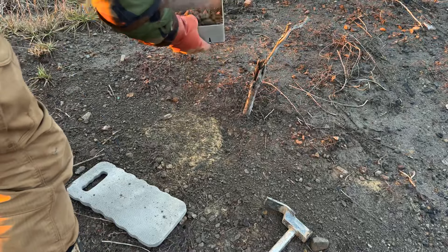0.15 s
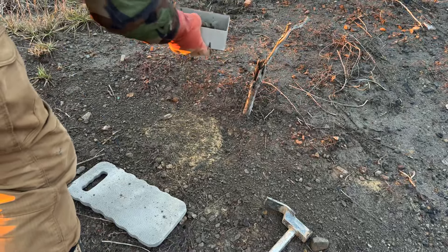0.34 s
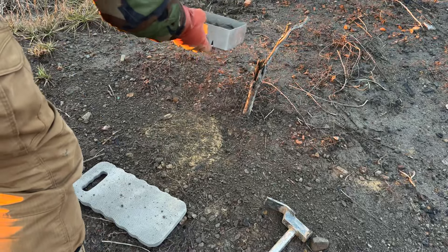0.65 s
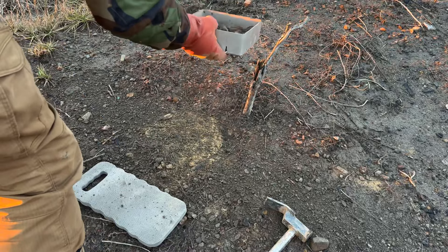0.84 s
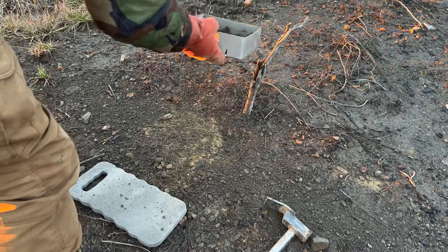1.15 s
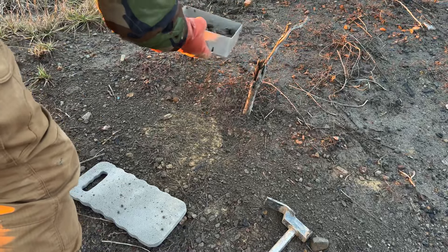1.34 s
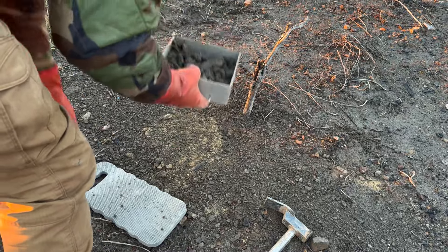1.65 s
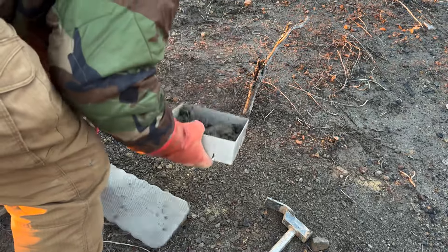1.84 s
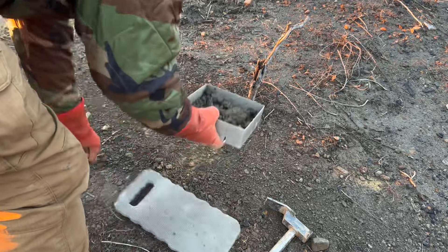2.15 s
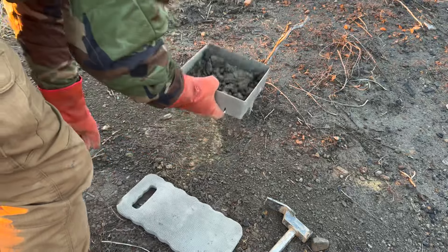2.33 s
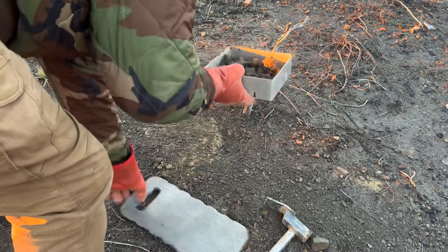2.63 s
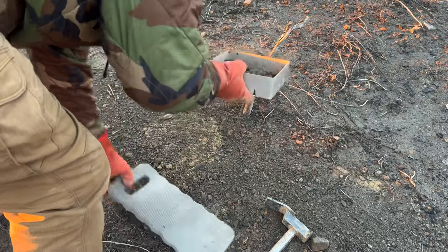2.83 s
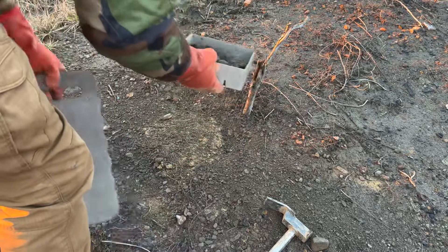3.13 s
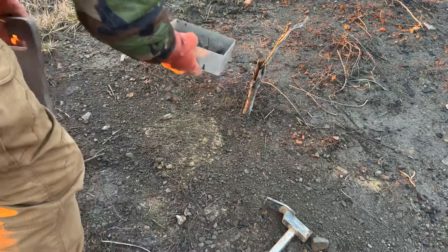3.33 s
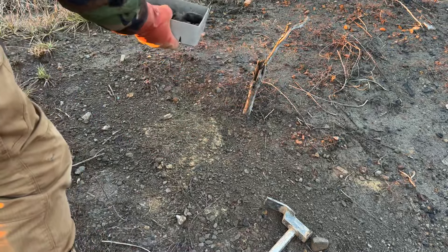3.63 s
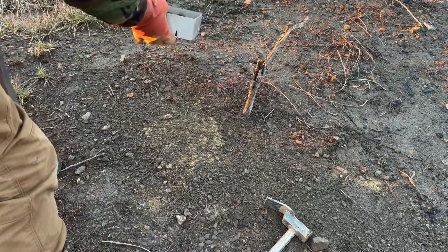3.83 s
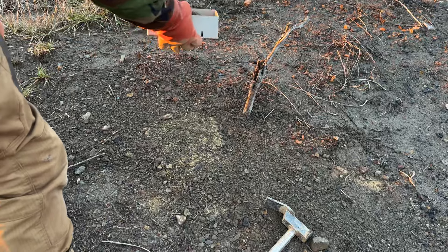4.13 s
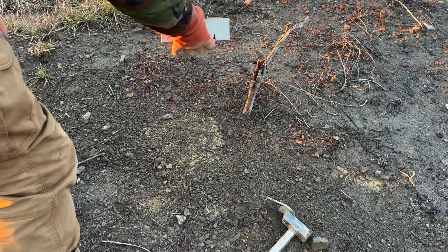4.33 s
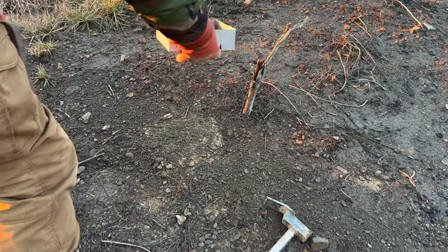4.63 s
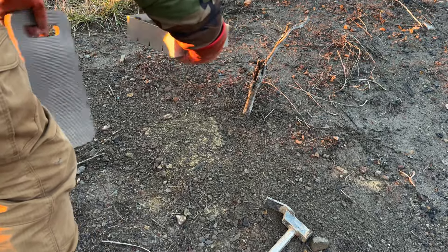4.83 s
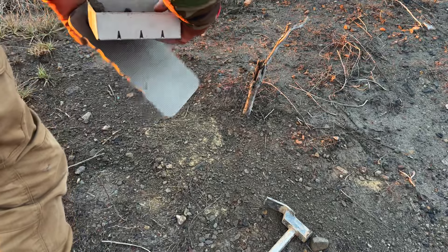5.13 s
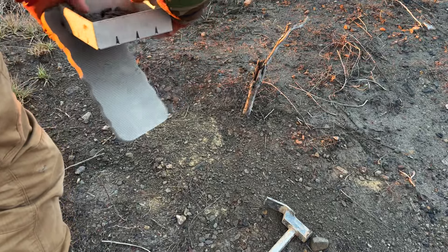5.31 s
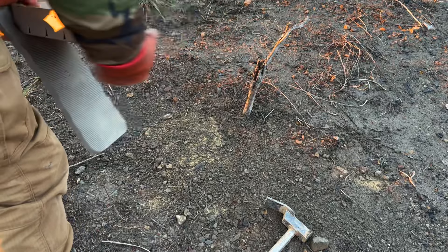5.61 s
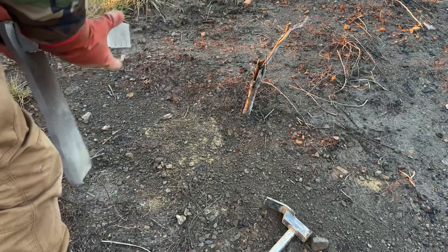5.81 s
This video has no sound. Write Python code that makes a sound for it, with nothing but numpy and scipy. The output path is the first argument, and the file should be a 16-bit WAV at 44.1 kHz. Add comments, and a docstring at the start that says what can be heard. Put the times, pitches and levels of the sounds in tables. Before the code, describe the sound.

Outdoors, close in stereo, a small metal sifter loaded with dirt and stones is shaken by hand. From 0 to 0.9 seconds it is dense and loud: gritty scratching, sandy high hiss, stones knocking the walls with short metallic ring, strongest near 0.47 and 0.65, the floor drumming low, and clods popping dully on the ground, a big one at 0.85. Wind rumbles and flutters briefly near 0.5. Shaking weakens until 1.5. Around 1.7 to 2.2 a boot grinds gravel, with clod cracks, low thuds and stiff clothing rustle. A hard, bright clack at 2.38 restarts the shaking, now lighter, in separate strokes with knocks around 3.2 and 3.7, thinning out by 4.6. Then mostly fabric swishes and creases, with a dull clod-like thump at 5.27, faint metal ticks at 5.5 and 5.7, and a last soft rustle over quiet open air.

```python
"""Outdoors, a small metal box sifter full of dirt and stones is shaken by hand.
Stones knock on its walls as short bursts that make the metal ring (one late, dull clod-like thump is made the
same way); many tiny clicks make the grit scratch. The loaded floor drums as a low, quickly fading swing.
Clods crack on the ground as dull pops and gravel grinds underfoot as the person steps and bends. Thuds are
low swings; work clothes rustle as coloured noise and creases. A little wind touches the microphone as low,
fluttering noise, over a faint bed of open air.
"""
import sys
import numpy as np
from scipy import signal
from scipy.fft import rfft, irfft, next_fast_len
from scipy.io import wavfile
from scipy.ndimage import uniform_filter1d

SR = 44100
rng = np.random.default_rng(int(sys.argv[2]) if len(sys.argv) > 2 else 0)


def generate_wav(signal):
    """Clip the signal to [-1, 1] and save it as 16-bit WAV at the path in sys.argv[1]."""
    frames = np.transpose(np.atleast_2d(signal))
    scaled = np.clip(frames, -1, 1) * 32767
    pcm = np.round(scaled).astype(np.int16)
    wavfile.write(sys.argv[1], SR, pcm)


N = 263053


def from_db(db):
    """Turn decibels into a gain."""
    return 10 ** (np.asarray(db) / 20)


def rms_one(x):
    """Scale a sound to an average power of 1."""
    return x / np.sqrt(np.mean(x ** 2) + 1e-20)


def at_hz(points, hz):
    """Read a table along a logarithmic pitch scale, with straight lines between its points."""
    points = np.array(points)
    return np.interp(np.log(hz + 1e-9), np.log(points[:, 0]), points[:, 1])


def in_time(rows, column):
    """Read one column of a curve at every sample."""
    rows = np.array(rows)
    return np.interp(np.arange(N) / SR, rows[:, 0], rows[:, column])


def shape(x, response):
    """Filter a sound by a function of frequency."""
    size = next_fast_len(N + 4096)
    spectrum = rfft(x, size) * response(np.fft.rfftfreq(size, 1 / SR))
    return irfft(spectrum, size)[..., :N]


def band(x, low_hz, high_hz, order=2):
    """Keep what lies between two frequencies."""
    edges_hz = [low_hz, min(high_hz, .45 * SR)]
    return signal.sosfilt(signal.butter(order, edges_hz, "band", fs=SR, output="sos"), x + 1e-18)


def resonate(x, hz, width_hz):
    """Ring at one pitch, with gain 1 at the peak; a narrower resonance rings longer."""
    r = np.exp(-np.pi * width_hz / SR)
    feed = np.array([1, 0, -1]) * (1 - r * r) / 2
    return signal.lfilter(feed, [1, -2 * r * np.cos(2 * np.pi * hz / SR), r * r], x + 1e-18)


def ring_together(x, modes, most_sharpness=np.inf):
    """Add up several resonances with alternating sign; sharpness is pitch over width."""
    ringing = 0
    for k, (hz, width_hz, db) in enumerate(modes):
        ringing = ringing + (-1) ** k * from_db(db) * resonate(x, hz, max(width_hz, hz / most_sharpness))
    return ringing


def drift(rate):
    """Random wandering with unit power, joining `rate` random points a second."""
    knots = rng.standard_normal(4096)
    return rms_one(np.interp(np.arange(N) / SR * rate, np.arange(len(knots)), knots))


def pan(db):
    """Left and right gains, fixed or moving; above 0 dB the left is louder."""
    return from_db(np.array([[1], [-1]]) * db / 2)


def widen(three, spread):
    """Make stereo from one shared signal plus one of its own for each side."""
    return (three[0] + spread * three[1:]) / np.sqrt(1 + spread ** 2)


def add(out, s, sound):
    """Mix a sound in, starting at time s."""
    at = max(round(s * SR), 0)
    out[:, at:at + sound.shape[-1]] += sound[..., :N - at]


def grains(per_s, size_db, clump_db, spread):
    """Stereo clicks at random moments, uneven in size and stronger in clumps."""
    born = rng.random(N) < per_s / SR
    uneven_db = size_db * np.minimum(rng.exponential(1, N), 4)
    clumps_db = clump_db * np.clip(drift(130), -2, 1.5)
    return widen(rng.standard_normal((3, N)), spread) * born * from_db(uneven_db + clumps_db)


def pebbles(per_s, size_db, low_hz, high_hz, sharpness, count=14):
    """Small stones tick: each click is dealt to one of several pitches and rings there."""
    ticks = grains(per_s, size_db, clump_db=5.0, spread=0.49)
    dealt = rng.integers(0, count, N)
    pitches_hz = np.geomspace(low_hz, high_hz, count)
    return sum(resonate(ticks * (dealt == k), hz, hz / sharpness) for k, hz in enumerate(pitches_hz))


def noise(spectrum, spread):
    """Coloured stereo noise of unit power."""
    white = widen(rng.standard_normal((3, N)), spread)
    return rms_one(shape(white, lambda hz: from_db(at_hz(spectrum, hz))))


def steady(x, span_s):
    """Hold the power near 1 over a span, leaving the grain inside it."""
    power = uniform_filter1d(np.mean(x ** 2, axis=0), int(span_s * SR))
    return x / np.sqrt(np.maximum(power, 1e-18))


def swells(rows, attack_s, release_s, share=False):
    """Gain of movements that swell and die by 20 dB in the given times; share adds the fourth column's dB."""
    t, power = np.arange(0, N, 32) / SR, 1e-16
    for s, length_s, db, *part_db in rows:
        outside = np.maximum(s - t, 0) / attack_s + np.maximum(t - s - length_s, 0) / release_s
        level_db = db + (part_db[0] if share else 0)
        power = power + from_db(level_db - 20 * np.minimum(outside, 10)) ** 2
    return np.interp(np.arange(N) / SR, t, np.sqrt(power))


def air():
    """Open air: faint, steady noise that is independent in part on each side."""
    # colour of the air: pitch_hz, relative level_db
    air_colour = [(24, -8.5), (40, -3), (115, -11), (210, -11.5), (550, -6.5), (800, -12.5), (1700, -17.5),
                  (4000, -22.5), (10000, -29), (13000, -31.5), (16000, -40)]
    level_db = -63
    return from_db(level_db) * noise(air_colour, spread=1.0)


def wind():
    """Wind buffets each port largely by itself: deep rumble, with lumpy flutter in the stronger gusts."""
    # wind strength before the small lifts below: time_s, rumble_db, flutter_db
    gusts = [(0.0, -47.5, -72), (0.45, -42.5, -39.5), (0.98, -63, -53.5), (1.73, -55, -68.5),
             (1.84, -49.5, -42), (2.06, -66, -64.5), (2.92, -58.5, -56.5), (3.07, -67, -63.5),
             (5.96, -68, -72)]
    rumble = steady(band(widen(rng.standard_normal((3, N)), spread=1.4), 47, 82), span_s=0.046)
    flutter = band(widen(rng.standard_normal((3, N)), spread=2.5), 64, 160)
    flutter = steady(flutter * from_db(3.0 * drift(45)), span_s=0.12)
    rumble_gain = from_db(2.0 + in_time(gusts, column=1))
    flutter_gain = from_db(2.5 + in_time(gusts, column=2))
    return pan(4.3) * (rumble_gain * rumble + flutter_gain * flutter)


def clothes():
    """Stiff fabric swishes and flaps in small creases; a brushing sleeve adds a soft narrow hiss."""
    # arm and leg movements, before the final trims: start_s, length_s, swish_db, flap_against_swish_db
    rustles = [(1.76, 0.14, -48, -3), (1.96, 0.075, -47.5, -1), (2.18, 0.019, -52.5, 2),
               (2.31, 0.024, -60, -1), (4.605, 0.036, -57, 6), (4.75, .12, -57, -5.5),
               (5.035, 0.046, -45, -2), (5.278, 0.0083, -45.5, -3.5), (5.405, 0.048, -50, -1.5),
               (5.698, 0.0073, -54.5, 0.5), (5.785, 0.022, -57, 1), (5.91, 0.035, -57, -5.5)]
    # a sleeve brushes along the jacket: start_s, length_s, level_db
    brushes = [(4.58, 0.026, -57), (4.78, 0.087, -58.5), (5.795, 0.0085, -55.5)]
    # colours of swish and flap: pitch_hz, relative level_db
    swish_colour = [(800, -14.5), (1500, -8.5), (2500, -9), (3500, -10.5), (5000, -6), (6200, -13.5),
                    (8400, -10), (10000, -14.5), (13000, -24), (15500, -7)]
    flap_colour = [(71, -22), (120, 8.5), (157, -31.5), (227, 1.5), (551, -9.5), (882, -5.5), (1360, -12.5),
                   (2500, -34.5), (3250, -54), (5500, -120)]
    attack_s, release_s = 0.063, 0.11

    crinkle = grains(per_s=1800, size_db=2.5, clump_db=3, spread=0.88)
    crinkle = rms_one(band(crinkle, 1800, 18000))
    swish = noise(swish_colour, spread=1.0) * from_db(4.6 * drift(170))
    swish = steady(swish + .6 * crinkle, span_s=0.14)
    creases = from_db(4.5 * drift(110))
    flap = steady(noise(flap_colour, spread=0.91) * creases, span_s=0.075)
    brush = rms_one(band(widen(rng.standard_normal((3, N)), spread=0.32), 3900, 5100))

    swish = from_db(3.5) * swish * swells(rustles, attack_s, release_s)
    flap = from_db(-1.6) * flap * swells(rustles, attack_s, release_s, share=True)
    return pan(0.45) * (swish + flap + brush * swells(brushes, attack_s, release_s))


def clods():
    """A clod cracks with a dull pop of a few swings, then crumbles in fading noise."""
    # clods and gravel cracking on the ground: time_s, pop_db, pitch_hz, left_right_db
    cracks = [(0.46, -21, 1150, 6), (0.5552, -18, 1140, 6), (0.618, -23.5, 1290, 4), (0.7597, -19, 1080, 4),
              (0.8545, -13, 1140, 4), (1.1195, -26.5, 930, 8), (1.7158, -29, 1854, 1),
              (1.7458, -22.5, 1380, 0), (1.782, -20, 1210, -10), (1.8015, -17.5, 1130, 3),
              (1.931, -26, 1780, 1.3), (1.982, -27.5, 650, 4.5), (2.0067, -29, 1230, 3),
              (2.0458, -26.5, 922, 1), (2.0505, -29, 788, 3), (2.1946, -31, 1005, 2.5),
              (2.203, -30, 840, -0.5), (2.5933, -30.5, 1250, 0), (5.024, -33.5, 970, 8),
              (5.0375, -35, 1460, 12), (5.177, -39, 920, 5), (5.3685, -40.5, 920, 8)]
    pop_cycles, crumble_gain, crumble_t60_s = 0.92, .09, 0.057
    out, t = np.zeros((2, N)), np.arange(SR // 25) / SR
    for s, db, hz, side_db in cracks:
        age = t * hz / pop_cycles
        pop = (age * np.exp(1 - age)) ** 2 * np.sin(2 * np.pi * (hz * t + rng.random()))
        crumbs = rms_one(band(widen(rng.standard_normal((3, len(t))), spread=.5), 600, 2000, order=1))
        crumbs = crumble_gain * crumbs * from_db(-60 * t / crumble_t60_s)
        add(out, s, from_db(db) * pan(side_db) * (pop + crumbs))
    return out


def gravel():
    """Gravel grinds under the boot: many small stones tick at medium pitches."""
    # a boot rolls over gravel: start_s, length_s, level_db
    steps = [(1.76, 0.051, -36), (1.98, .05, -50), (2.18, 0.029, -49), (5.91, 0.01, -57.5)]
    grind = pebbles(per_s=1100, size_db=2.5, low_hz=765, high_hz=1670, sharpness=2.4)
    grind = steady(band(grind, 810, 2700), span_s=0.035)
    return swells(steps, attack_s=0.038, release_s=0.14) * grind * pan(3.0)


def low_blows(events, rise_s, scatter, rough):
    """Soft blows (s, dB, Hz, t60 s): a fading low swing with scattered pitch, roughened by loose lumps."""
    out, t = np.zeros((2, N)), np.arange(SR // 4) / SR
    for (s, db, hz, t60), chance in zip(events, rng.uniform(-1, 1, len(events))):
        swing = np.sin(2 * np.pi * hz * (1 + scatter * chance) * t)
        lumps = rough * rms_one(band(rng.standard_normal(len(t)), 460, 600)) * from_db(-30 * t / t60)
        add(out, s, from_db(db - 60 * t / t60) * (1 - np.exp(-t / rise_s)) * (swing + lumps))
    return out


def thuds():
    """Boot and kneeling pad land softly: a low swing that fades by 60 dB within nine cycles."""
    # thuds before the 7 dB lift: time_s, level_db, middle pitch_hz
    landings = [(0.429, -39, 90), (0.499, -41, 190), (0.906, -41.5, 261), (1.838, -31, 243.5),
                (1.85, -33.5, 110), (1.86, -30.5, 278), (1.965, -42.5, 250), (2.859, -43.5, 120),
                (4.724, -44, 210), (5.026, -43, 257), (5.043, -41.5, 200), (5.119, -41, 247),
                (5.274, -31.5, 260), (5.698, -40, 277)]
    cycles = 9
    blows = [(s, db, hz, cycles / hz) for s, db, hz in landings]
    return from_db(7.0) * pan(1.7) * low_blows(blows, rise_s=0.0017, scatter=0.094, rough=0.24)


def drum():
    """The load lands on the floor of the box, which swings in its lowest mode."""
    # landings before the 8 dB lift: time_s, level_db
    landings = [(0.466, -35.5), (0.651, -37), (0.696, -50.5), (1.414, -43.5), (1.469, -38.5), (2.652, -46),
                (2.766, -51.5), (2.915, -52), (3.049, -42), (3.61, -51), (3.871, -42), (4.063, -39),
                (4.304, -46), (4.555, -42)]
    middle_hz, t60_s = 305.3, 0.11
    blows = [(s, db, middle_hz, t60_s) for s, db in landings]
    return from_db(8.0) * low_blows(blows, rise_s=0.00067, scatter=0.039, rough=0.18)


def walls(x, direct_db):
    """The walls ring on top of the bare contact sound; the dirt keeps every ring short."""
    # ringing of the walls: pitch_hz, least width_hz, level_db
    wall_modes = [(1005, 93, -3), (1242, 150, 8), (1966, 47, 0), (2054, 37, 2.5), (2540, 470, 8),
                  (2653, 43, 9.5), (2646, 60, 0.5), (4013, 30, 9.5), (5830, 37, -1.5), (6460, 120, 5),
                  (7550, 63, -7), (8830, 130, -8)]
    ringing = ring_together(x, wall_modes, most_sharpness=30)
    return ringing + from_db(direct_db) * band(x, 220, 21000, order=1)


def load_motion():
    """Each stroke of the hand throws the load across the box; returns the sliding and rolling gains."""
    # hand strokes: start_s, length_s, scratch_db, lumps_against_scratch_db (sound levels are trimmed later)
    strokes = [(0.0, 0.11, -42.5, -12), (0.09, 0.032, -40.5, -21), (0.195, 0.02, -39, -23),
               (0.24, 0.051, -37, -9.5), (0.29, 0.034, -40, -8), (0.41, 0.033, -37, -23),
               (0.46, 0.018, -37, 0), (0.545, 0.043, -41.5, -8.5), (0.635, 0.038, -36, -5),
               (0.80, 0.035, -44.5, -17), (0.865, 0.061, -58.5, 6), (1.01, 0.064, -46.5, -30),
               (1.095, 0.052, -43, -6), (1.225, 0.069, -42.5, -15.5), (1.34, 0.031, -44, -5.5),
               (1.395, 0.026, -42, -12), (1.466, 0.006, -41.5, 3), (2.37, 0.059, -43, -12.5),
               (2.52, .05, -40, -13.5), (2.66, 0.034, -37.5, -13.5), (2.76, 0.028, -42.5, -7.5),
               (2.90, 0.075, -46, 0.5), (3.03, 0.021, -38.5, -3), (3.19, 0.042, -46, -11),
               (3.325, 0.013, -44.5, -11), (3.405, 0.062, -46, -16), (3.525, 0.094, -45.5, -10.5),
               (3.67, 0.072, -48, -9.5), (3.805, 0.075, -44.5, -6.5), (3.934, 0.0083, -35, -19),
               (4.02, 0.071, -43.5, -9), (4.197, 0.0087, -44, -34), (4.315, .035, -42.5, -11.5),
               (4.40, .045, -52, -1), (4.57, 0.027, -45.5, -0.5)]
    # while the box is shaken the dirt never quite rests: start_s, length_s, level_db
    bouts = [(0, 0.93, -51.5), (0.9, 0.46, -56), (2.36, 1.74, -53.5), (4.15, 0.46, -58)]
    attack_s, release_s = 0.04, 0.046
    resting_lumps_db = -11.5   # tumbling against scratch between strokes
    resting = swells(bouts, attack_s, release_s)
    sliding = np.hypot(swells(strokes, attack_s, release_s), resting)
    rolling = swells(strokes, attack_s, release_s, share=True)
    return sliding, np.hypot(rolling, from_db(resting_lumps_db) * resting)


def tumble():
    """Lumps tumble on the loaded floor and set off its low resonances."""
    # the loaded floor of the box: pitch_hz, width_hz, level_db
    floor_modes = [(283, 26, 6.5), (420, 100, -3), (551, 160, -0.5), (650, 230, -0.5)]
    lumps = grains(per_s=700, size_db=1.5, clump_db=5, spread=0.68)
    ringing = ring_together(lumps, floor_modes)
    return from_db(-2.0) * steady(band(ringing, 170, 720), span_s=0.1)


def scratch(dry_ticks):
    """Pebbles scratch along the walls, and single small stones tick out of the scratch."""
    coarse = rms_one(pebbles(per_s=1100, size_db=3.0, low_hz=860, high_hz=3270, sharpness=5))
    rubbing = band(walls(coarse + 1.7 * dry_ticks, direct_db=-1.0), 680, 2700)
    stray = pebbles(per_s=90, size_db=.5, low_hz=1090, high_hz=2830, sharpness=6.5)
    stray = rms_one(walls(stray, direct_db=5.5))
    return from_db(-1.83) * steady(rubbing, span_s=.05) + from_db(-4) * stray


def sand(dry_ticks):
    """The finest sand runs through the mesh as dense high ticks and slowly runs out."""
    start_db, loss_db_per_s = -4, 0.83
    fine = rms_one(pebbles(per_s=4300, size_db=1.8, low_hz=3800, high_hz=14200, sharpness=5))
    running = walls(fine + 0.48 * band(dry_ticks, 3000, 11000), direct_db=-2.0)
    sand_left = from_db(start_db - loss_db_per_s * np.arange(N) / SR)
    return sand_left * steady(running, span_s=.07)


def grit():
    """The strokes drive tumbling lumps, scratching pebbles and running sand together."""
    sliding, rolling = load_motion()
    # sharp edges catch: all pitches at once
    dry_ticks = rms_one(grains(per_s=440, size_db=3.2, clump_db=2.5, spread=0.52))
    rubbing = scratch(dry_ticks) + sand(dry_ticks)
    return rolling * tumble() * pan(3.2) + sliding * rubbing * pan(0.6)


def knocks():
    """A blow rings the walls, chatters to rest and stirs the dirt; harder contact trades dull body for edge."""
    # stones strike the box; the blow at 5.274 s is a dull, low clod-like thump:
    # time_s, level_db, hardness_db (tilt to the treble), chatter_t60_s
    strikes = [(0.0373, -24.5, -2, 0.051), (0.1, -31.5, -0.5, 0.093), (0.159, -35.5, 2, 0.23),
               (0.2187, -35, 1, 0.023), (0.2386, -27, 7.5, 0.078), (0.258, -22.5, -4, 0.034),
               (0.3142, -29.5, 3.5, 0.14), (0.41, -34, 1, 0.14), (0.465, -14, -7.5, .03),
               (0.538, -24.5, 14.5, 0.056), (0.643, -28, 3, 0.13), (0.65, -13, 0, 0.023),
               (0.666, -27, 10, 0.016), (0.8013, -33.5, 12, 0.021), (0.821, -36, 5, 0.036),
               (0.8807, -25, 0, 0.025), (0.9673, -40.5, 9, 0.11), (1.022, -40.5, -5, .03),
               (1.3432, -42.5, 3, 0.037), (1.0959, -34.5, 5.5, 0.023), (1.2222, -34.5, 4.5, 0.14),
               (1.3983, -36, 14, 0.048), (1.463, -24.5, -11.5, 0.031), (2.3632, -24, 1, 0.041),
               (2.376, -14.5, 5.5, 0.028), (2.408, -31, -2, 0.067), (2.4181, -27.5, 7.5, .029),
               (2.554, -25.5, 6, 0.041), (2.5639, -31, -10, 0.02), (2.6351, -34, 3, 0.033),
               (2.6836, -30, -7, 0.021), (2.7797, -33.5, -11, 0.0038), (2.8566, -44, 15, 0.0086),
               (2.9076, -30.5, -0.5, 0.035), (2.9128, -34, 1, 0.068), (3.0216, -26, -18, .019),
               (3.0418, -32.5, -14, 0.02), (3.1665, -35.5, 5.5, 0.061), (3.191, -37.5, 2, 0.055),
               (3.2163, -22, 2, 0.023), (3.4295, -28, 1, 0.024), (3.5702, -31, -12, 0.012),
               (3.6709, -23, 2, 0.023), (3.7083, -30, 2.5, 0.035), (3.952, -39, -18, 0.045),
               (4.0466, -49, 22, .012), (4.1718, -36, 0.5, 0.028), (4.3273, -38, -9, 0.02),
               (4.4241, -39.5, -10.5, 0.035), (4.5172, -39, -6, 0.05), (4.557, -33.5, -4, .033),
               (4.593, -44.5, -11, 0.021), (5.274, -39.5, -24, 0.0086), (5.5124, -37.5, 24.5, 0.017),
               (5.6297, -49, 4.5, .012), (5.699, -42.5, 11, 0.047)]
    # body, clack, edge and tip of a knock: low_hz, high_hz
    knock_bands = [(450, 1800), (1800, 4500), (4500, 9500), (9500, 16000)]
    chatter_gain, tail_db, tail_t60_s = 0.073, -25, 0.32
    own_ring_gain, side_scatter_db = 1.94, 2.5
    body_db, edge_db, tip_db = -9, -8, -20   # against the clack, at hardness 0
    tip_per_hardness = 1.6   # the highest treble grows fastest with hardness

    out, t = np.zeros((2, N)), np.arange(SR // 8) / SR
    count = len(strikes)
    pushes = widen(rng.standard_normal((count, 3, len(t))).swapaxes(0, 1), spread=0.66)
    t60 = np.maximum(np.array(strikes)[:, 3:4], .004)
    pushes = chatter_gain * pushes * (from_db(-60 * t / t60) + from_db(tail_db - 60 * t / tail_t60_s))
    pushes[:, :, 8] += 1   # the first sharp contact
    # every blow favours a few pitches of its own
    own_pitches_hz = rng.uniform([1150, 2400, 3800], [1900, 3500, 7000], (count, 3))
    for k, pitches in enumerate(own_pitches_hz):
        pushes[:, k] += own_ring_gain * sum(resonate(pushes[:, k], hz, hz / 16) for hz in pitches)

    struck = band(walls(pushes, direct_db=-1.0), 300, 21000, order=1)
    parts = np.array([band(struck, low, high, order=3) for low, high in knock_bands])
    # each part gets unit power over the first 8 ms, so that hardness alone sets the mix
    attack = t < .008
    parts /= np.sqrt(np.mean(parts[..., attack] ** 2, axis=(1, 3), keepdims=True))
    sides_db = side_scatter_db * rng.uniform(-1, 1, count) + 0.5
    for k, (s, db, hardness_db, _) in enumerate(strikes):
        shares = from_db([body_db - hardness_db, 0, edge_db + hardness_db,
                          tip_db + tip_per_hardness * hardness_db])
        knock = np.tensordot(shares / np.linalg.norm(shares), parts[:, :, k], 1)
        add(out, s, from_db(db) * pan(sides_db[k]) * knock)
    return out


def scene():
    """The sifter a little to the right, the ground below, open air all round."""
    # where the hand holds the box, before a fixed 0.4 dB shift to the right: time_s, left_right_db
    box_side = [(0, -1), (0.65, -1.5), (1.45, -1.5), (2.38, -1.5), (2.7, -3.5), (3.05, -2), (3.55, -0.5),
                (4.6, -0.5)]
    background = air() + wind()
    person = clothes() + clods() + gravel() + thuds()
    sifter = (grit() + knocks()) * pan(in_time(box_side, column=1) - .4)
    return background + person + drum() + sifter


def record(dry):
    """The two microphone ports differ in phase and dip in the high treble; the top is cut."""
    # microphone colour: pitch_hz, level_db
    mic_colour = [(8000, -1.53), (10000, 1.5), (11000, -15.5), (12000, -23), (13200, -4.5), (15500, -8.5)]
    # the two microphone ports: pitch_hz, left_lead_radians
    port_phase = [(300, -0.87), (1500, 1.02), (2400, 0.72), (3000, 1.34), (4000, 1.36), (5000, 2),
                  (6000, 0.99), (7000, -2.1), (8200, -0.6), (10000, -2.4), (13000, -1.2)]
    cutoff_hz = 15900
    left, right = shape(dry, lambda hz: from_db(at_hz(mic_colour, hz)))
    right = shape(right, lambda hz: np.exp(-1j * at_hz(port_phase, hz)))
    top_cut = signal.ellip(10, .2, 80, cutoff_hz, fs=SR, output="sos")
    return signal.sosfilt(top_cut, [left, right])


dry = scene()
out = record(dry)
generate_wav(out)
```